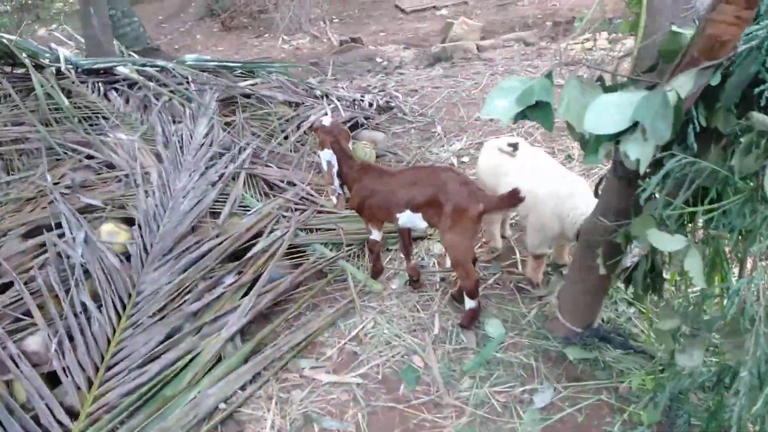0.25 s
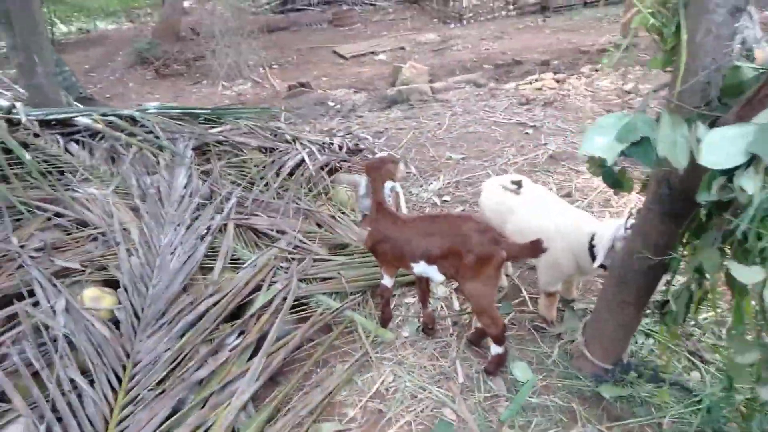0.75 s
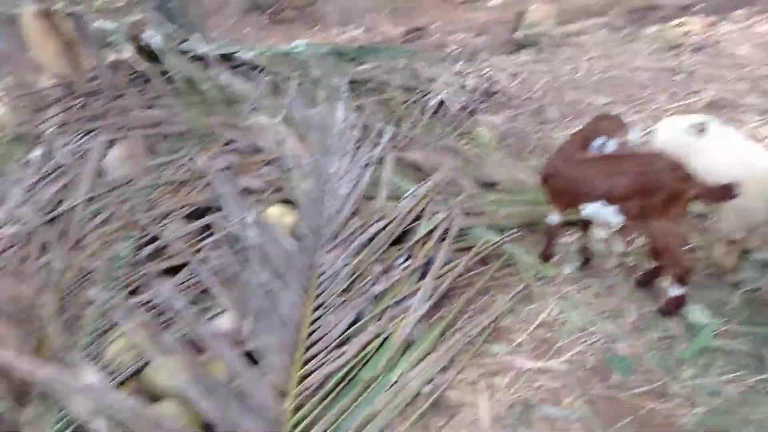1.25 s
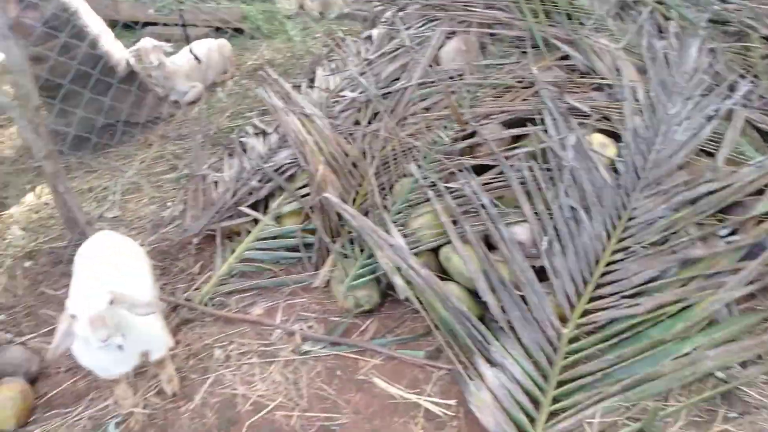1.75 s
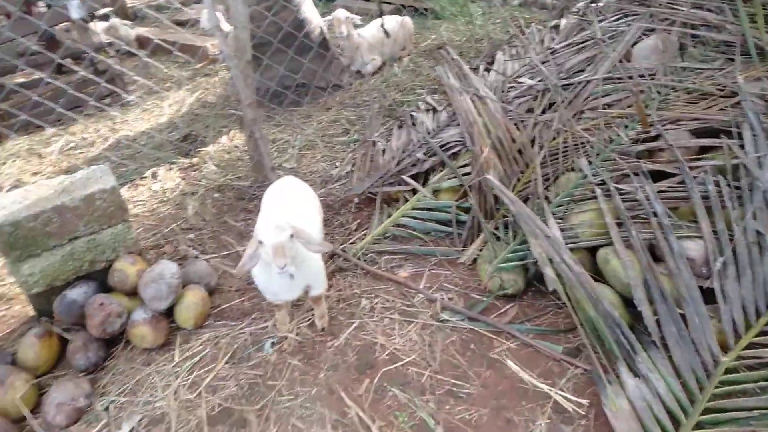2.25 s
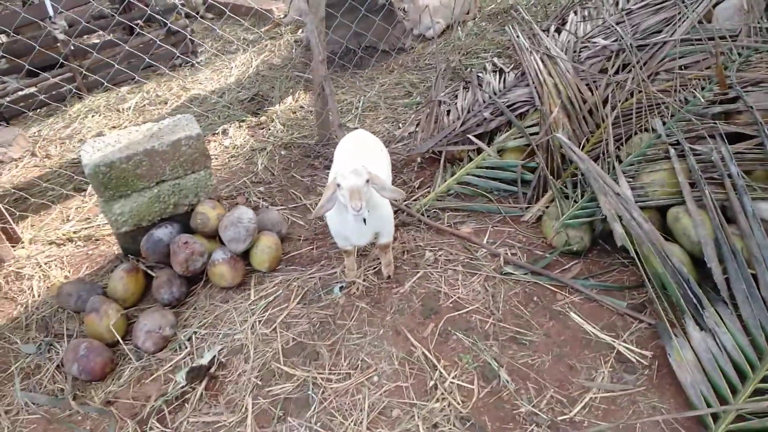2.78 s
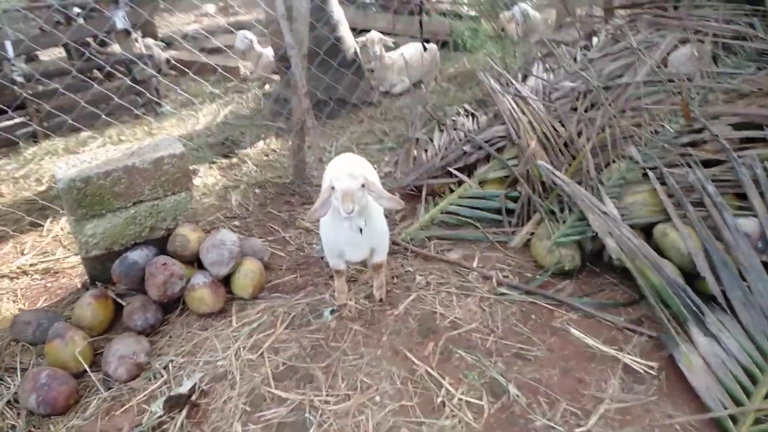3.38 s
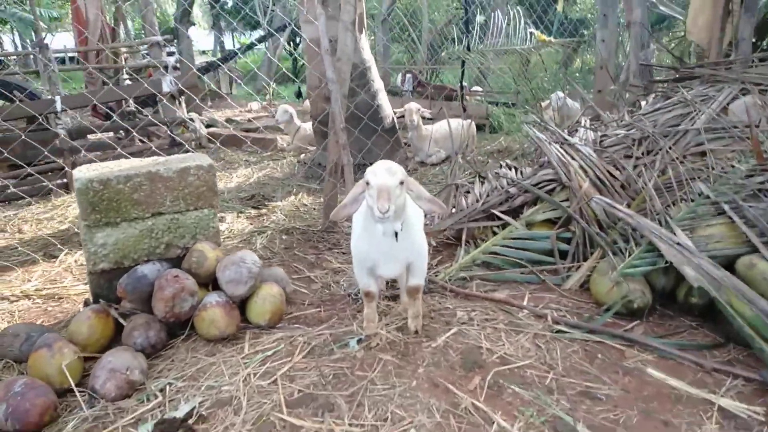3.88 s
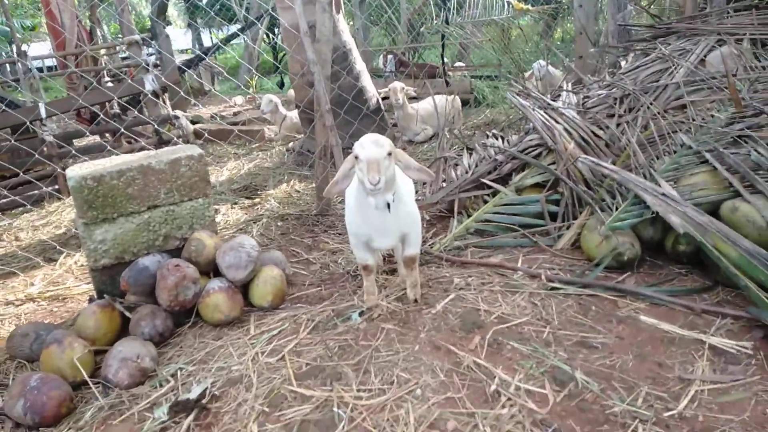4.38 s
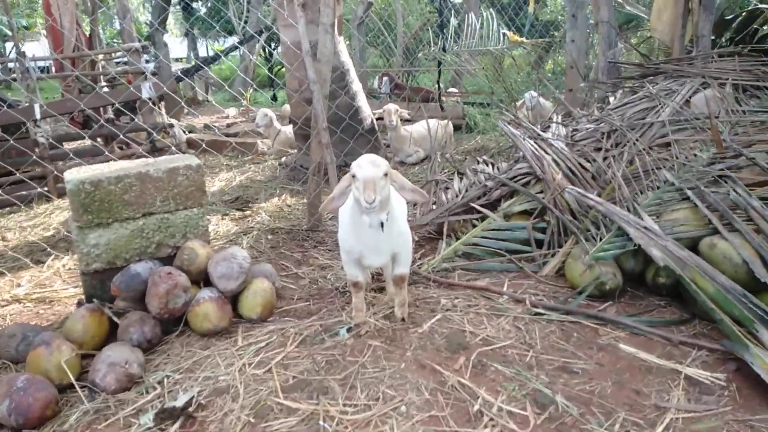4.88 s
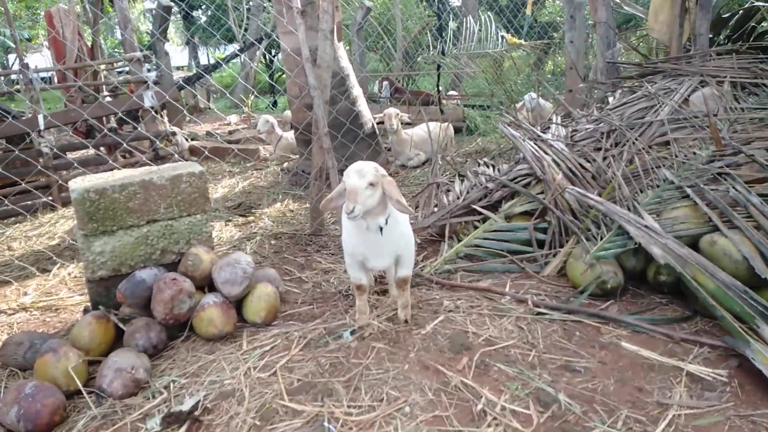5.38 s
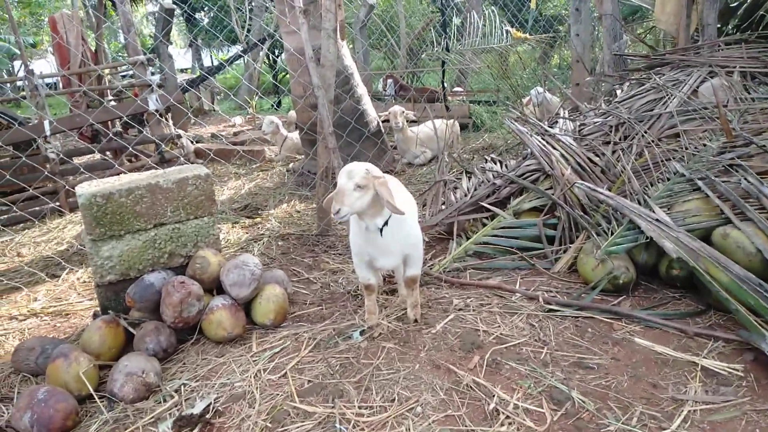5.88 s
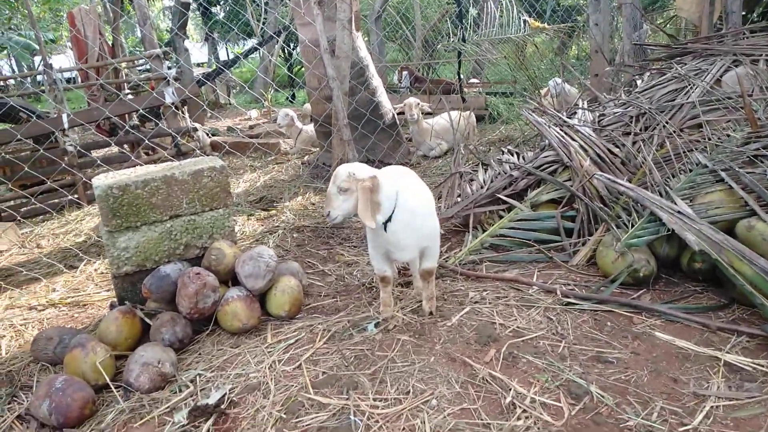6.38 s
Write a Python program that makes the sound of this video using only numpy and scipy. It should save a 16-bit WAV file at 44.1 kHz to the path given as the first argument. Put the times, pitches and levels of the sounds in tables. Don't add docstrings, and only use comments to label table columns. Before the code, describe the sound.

Quiet farmyard with small birds whistling, faint far bleats, dry fronds rustling and crackling, and one sharp close stalk snap midway.

```python
import sys
import numpy as np
from scipy import signal
from scipy.fft import rfft, irfft, next_fast_len
from scipy.io import wavfile
from scipy.ndimage import uniform_filter1d, map_coordinates

SR = 44100
rng = np.random.default_rng(int(sys.argv[2]) if len(sys.argv) > 2 else 0)


def invert_db(level):
    return 10 ** (np.asarray(level, dtype=float) / 20)


def wrap_up_sound(samples):
    columns = np.atleast_2d(samples).T
    tamed = np.clip(columns, -1, 1)
    steps = np.round(tamed * 32767).astype(np.int16)
    wavfile.write(sys.argv[1], SR, steps)


N = 292824


def unit(x):
    return x / np.sqrt(np.mean(x ** 2) + 1e-20)


def along(points, hz):
    f, db = np.transpose(points)
    return np.interp(np.log(hz + 1), np.log(f + 1), db)


def wobble(rate, n):
    return map_coordinates(rng.standard_normal(int(n * rate / SR) + 4), [np.arange(n) * rate / SR])


def filtered(x, response):
    m = next_fast_len(N + SR // 2)
    return irfft(rfft(x, m) * response(np.fft.rfftfreq(m, 1 / SR)), m)[:N]


def coloured(x, spectrum):
    return unit(filtered(x, lambda hz: invert_db(along(spectrum, hz))))


def hiss(spectrum):
    return coloured(rng.standard_normal(N), spectrum)


def patchy(patchy_db):
    z = signal.stft(rng.standard_normal(N + 512), nperseg=512)[2]
    field = uniform_filter1d(rng.standard_normal(z.shape), 6, 0)
    field = uniform_filter1d(field, 14, 1)
    return signal.istft(z * invert_db(patchy_db * unit(field)), nperseg=512)[1][:N]


def resonances(modes):
    def response(f):
        total = 0
        for k, (centre, width, db) in enumerate(modes):
            damping = 1j * f * width
            total = total + (-1) ** k * invert_db(db) * damping / (centre ** 2 - f ** 2 + damping)
        return total
    return response


def swells(rows):
    t = np.arange(0, N + 16, 16) / SR
    power = 0
    for s, db, swell, fade in rows:
        power = power + invert_db(db - 20 * np.maximum((s - t) / swell, (t - s) / fade)) ** 2
    return np.interp(np.arange(N) / SR, t, np.sqrt(power))


def add(track, s, sound):
    part = track[round(s * SR):][:len(sound)]
    part += sound[:len(part)]


def placed(events):
    track = np.zeros(N)
    for s, sound in events:
        add(track, s, sound)
    return track


def note(knots, direct_db, echo_db, t60, breath_hz=0, octave_db=-40, gather_s=.004, flutter_db=1.4):
    s, hz, db = np.transpose(knots)
    t = np.arange(int(s[-1] * SR)) / SR
    edge = np.clip(np.minimum(t, s[-1] - t) / 0.0056, 0, 1)
    pitch = np.interp(t, s, hz) + breath_hz * wobble(330, len(t))
    phase = 2 * np.pi * np.cumsum(pitch) / SR
    size = edge * invert_db(np.interp(t, s, db) + flutter_db * wobble(91.6, len(t)))
    tone = np.sqrt(2) * size * (np.sin(phase) + invert_db(octave_db) * np.sin(2 * phase))
    lag = np.arange(int(t60 * SR)) / SR
    tail = rng.standard_normal(len(lag)) * invert_db(-60 * lag / t60) * (1 - np.exp(-lag / gather_s))
    tail *= invert_db(echo_db) / np.linalg.norm(tail)
    tail[0] = invert_db(direct_db)
    return signal.fftconvolve(tone, tail)


def timed(knots, **voice):
    return knots[0][0], note(np.subtract(knots, [knots[0][0], 0, 0]), **voice)


def slide(length, start_hz, end_hz, db):
    return [(0, start_hz, db - 5),
            (.25 * length, .93 * start_hz + .07 * end_hz, db - 2),
            (.6 * length, .5 * (start_hz + end_hz), db),
            (length, end_hz, db - 5)]


def calls(rows, **voice):
    track = np.zeros(N)
    for s, length, start_hz, end_hz, db in rows:
        middle = (.35 * length, .72 * start_hz + .28 * end_hz, db)
        add(track, s, note([(0, start_hz, db - 5), middle, (length, end_hz, db - 5)], **voice))
    return track


# (f/Hz, level/dB per Hz)
YARD_COLOUR = [(12, -20), (20, 2), (116, -1), (347, -11.5), (642, -10), (1570, -15), (1910, -16.5),
               (2390, -20), (4810, -27), (5680, -19.5), (6910, -20), (9400, -32), (12800, -31.5),
               (14700, -27.5), (16000, -38.5)]


def yard():
    return invert_db(-58.78 + 0.25 * wobble(3.45, N)) * coloured(patchy(1.4), YARD_COLOUR)


# (t/s, level/dB)
HERD_LEVEL = [(0.0, -61.0), (0.37, -62.5), (0.7, -61), (1.0, -64), (1.52, -72), (2.35, -68.5), (3.0, -61.5),
              (3.42, -62.5), (3.62, -63), (3.75, -58.5), (4.46, -69), (4.83, -71), (5.12, -65), (5.47, -80),
              (6.12, -65.5), (6.64, -77)]
# (f/Hz, level/dB per Hz)
HERD_COLOUR = [(250, -50), (450, 3), (1000, -6), (1700, 2), (2500, -8), (4000, -50)]


def herd():
    s, db = np.transpose(HERD_LEVEL)
    loudness = invert_db(np.interp(np.arange(N) / SR, s, db, left=-120))
    return invert_db(-4.5) * loudness * coloured(patchy(-0.5), HERD_COLOUR)


# (t/s, length/s, start f/Hz, end f/Hz, level/dB)
CLEAR_CALLS = [
    (.49, 0.09, 1080, 1170, -69),
    (.62, .12, 3950, 4010, -77),
    (1.044, 0.081, 4600, 3400, -75.5),
    (3.66, .25, 1990, 1930, -63.5),
    (1.974, .04, 5400, 5300, -70),
    (4.512, .14, 2700, 2650, -72.5),
    (5.49, 0.12, 6780, 6700, -64.5),
    (5.74, 0.13, 1900, 1930, -72),
]


def clear_calls():
    return calls(CLEAR_CALLS, direct_db=-1.5, echo_db=-6.5, t60=.48, breath_hz=14)


# (t/s, length/s, start f/Hz, end f/Hz, level/dB)
HOARSE_CALLS = [(0, 0.12, 1450, 1624, -64.5), (0.043, 0.087, 1990, 2050, -69),
                (0.868, 0.16, 3680, 3070, -73), (3.655, 0.26, 1998, 1924, -62),
                (3.68, 0.17, 2200, 2230, -70), (3.686, 0.195, 1480, 1450, -68),
                (4.9, 0.17, 1740, 1620, -63), (5.04, .14, 1560, 1440, -65), (5.03, 0.24, 2100, 1680, -62),
                (4.865, 0.16, 4260, 4000, -65), (6.53, .09, 7100, 6900, -67)]


def hoarse_calls():
    return calls(HOARSE_CALLS, direct_db=-3, echo_db=-4.5, t60=.45, breath_hz=80)


# (t/s, f/Hz, level/dB)
LONG_CALL = [
    (.472, 1400, -66),
    (.5, 1450, -62),
    (.57, 1520, -66),
    (.64, 1680, -70),
    (.68, 1725, -65),
    (.76, 1700, -64),
    (.8, 1700, -71),
    (.95, 1690, -73),
]


def long_call():
    return placed([timed(LONG_CALL, direct_db=-1.5, echo_db=-8, t60=.45, breath_hz=45)])


# (t/s, length/s, start f/Hz, end f/Hz, level/dB)
FAR_BIRDS = [
    (0.122, 0.035, 7700, 6700, -51),
    (.28, .1, 7400, 6000, -65.5),
    (1.09, 0.04, 6750, 6300, -58.5),
    (2.168, 0.05, 7350, 6700, -62),
    (1.575, 0.05, 7400, 6000, -63),
]


def far_birds():
    voice = dict(direct_db=-10, echo_db=-1, t60=.45, breath_hz=150, gather_s=.008)
    return placed((s, note(slide(*call), **voice)) for s, *call in FAR_BIRDS)


# (t/s, length/s, start f/Hz, level/dB)
SLIDES_DOWN = [
    (3.24, 0.1, 4480, -56.5),
    (3.724, 0.1, 4620, -59.5),
    (4.25, .09, 4540, -60.5),
]


def hoarse_bird():
    voice = dict(direct_db=-12, echo_db=-1.5, t60=.55, breath_hz=85, octave_db=-11, gather_s=.035, flutter_db=2)
    return placed((s, note(slide(length, hz, .835 * hz, db), **voice)) for s, length, hz, db in SLIDES_DOWN)


# (t/s, f/Hz, level/dB)
WHISTLE = [
    (0, 6800, -5),
    (.02, 5900, -6),
    (.038, 5600, -6),
    (.06, 6130, -4.5),
    (.085, 6390, -1),
    (.12, 6370, 0),
    (.17, 6000, -5.5),
    (.205, 5450, -6),
    (.235, 5080, -8),
]
# (t/s, level/dB)
WHISTLE_TIMES = [
    (3.98, -58.5),
    (6.285, -60.5),
]


def thin_whistles():
    voice = dict(direct_db=-3.5, echo_db=-8, t60=0.4, breath_hz=35, flutter_db=2.5)
    return placed((s, invert_db(db) * note(WHISTLE, **voice)) for s, db in WHISTLE_TIMES)


# (t/s, length/s, start f/Hz, end f/Hz, level/dB)
WALL_RETURNS = [(.1, .06, 3380, 3370, -72), (1.45, .035, 3290, 3300, -60), (1.49, .06, 3310, 3300, -72),
                (1.57, .05, 3280, 3290, -72), (3.728, .095, 4640, 4620, -71), (3.27, .1, 4500, 4480, -71),
                (2.8, .06, 3350, 3340, -72), (3.147, .04, 3380, 3370, -65), (3.44, .06, 3400, 3390, -65),
                (3.5, .06, 3400, 3390, -66), (3.75, .08, 3500, 3490, -66), (5.9, .03, 3400, 3390, -64),
                (6.21, .05, 3372, 3360, -68), (4.13, .1, 6420, 6400, -72)]


def wall_returns():
    return calls(WALL_RETURNS, direct_db=-3, echo_db=-5, t60=.3, breath_hz=50)


# (t/s, held f/Hz, held level/dB, drop level/dB, hold/s)
HELD_NOTES = [
    (0.031, 3380, -59, -53.5, 0.036),
    (1.398, 3300, -54.5, -56, 0.043),
    (2.727, 3350, -60.5, -59, 0.044),
    (3.074, 3350, -57.5, -58, 0.036),
    (3.378, 3390, -63, -55.5, 0.04),
    (3.714, 3500, -58, -56.5, .024),
    (5.807, 3384, -55, -59, 0.04),
    (6.132, 3372, -53.5, -58.5, 0.046),
]


def dropping_bird():
    voice = dict(direct_db=-3, echo_db=-6.5, t60=0.33, breath_hz=65, flutter_db=2.2)
    track = np.zeros(N)
    for s, held_hz, held_db, drop_db, hold in HELD_NOTES:
        end_hz = .77 * held_hz
        knots = [(0, held_hz, held_db - 7),
                 (.015, held_hz - 30, held_db - 2),
                 (hold - .008, held_hz, held_db + 1),
                 (hold, held_hz - 90, drop_db),
                 (hold + .012, .35 * held_hz + .65 * end_hz, drop_db),
                 (hold + .022, end_hz + 30, drop_db - 3),
                 (hold + .032, end_hz - 40, drop_db - 12)]
        add(track, s, note(knots, **voice))
    return track


# (t/s, length/s, top f/Hz, level/dB)
NEAR_CLUCKS = [
    (1.347, .03, 2070, -61),
    (1.382, .02, 1900, -67),
    (3.012, .032, 2150, -57),
    (3.322, .034, 2000, -55),
]


def clucks():
    voice = dict(direct_db=-1, echo_db=-9, t60=.25, breath_hz=50)
    return placed((s, note([(0, .93 * hz, db - 8), (.5 * length, hz, db), (length, .92 * hz, db - 7)], **voice))
                  for s, length, hz, db in NEAR_CLUCKS)


# (t/s, sway level/dB, bump level/dB)
GRIP_SHIFTS = [(2.95, -66, -62), (3.12, -46, -53.5), (3.24, -58, -83), (3.36, -45.5, -53), (3.53, -61, -49),
               (3.6, -49, -46), (3.89, -58, -60), (4.3, -52, -51), (4.35, -44.5, -48.5), (4.59, -55, -60.5),
               (4.98, -58.5, -68), (5.29, -61, -60), (5.69, -52, -74), (6.08, -53, -64), (6.63, -45, -49.5)]
# (f/Hz, level/dB per Hz)
SWAY_COLOUR = [(12, 5), (35, 10), (60, -3.5), (120, -43.5)]
# (f/Hz, level/dB per Hz)
BUMP_COLOUR = [(30, -20), (70, 2), (120, -4), (220, -16), (450, -60)]


def hand():
    swell_s, fade_s = .1, .09
    sway = swells([(s, sway_db, swell_s, fade_s) for s, sway_db, _ in GRIP_SHIFTS])
    bump = swells([(s, bump_db, swell_s, fade_s) for s, _, bump_db in GRIP_SHIFTS])
    return sway * hiss(SWAY_COLOUR) + bump * hiss(BUMP_COLOUR)


# (t/s, peak level/dB, 20 dB swell/s, 20 dB fade/s)
TIP_BRUSHES = [
    (.7, -73, .8, .8),
    (1.4, -72, .2, .15),
    (2.25, -71, .25, .25),
    (3.05, -71, .25, .25),
    (4.15, -70, .8, .8),
    (5.98, -68, .1, .1),
    (6.24, -54.5, .25, .35),
]
# (f/Hz, level/dB per Hz)
TIP_COLOUR = [(8000, -40), (12000, -12), (14500, 0), (16500, 0)]


def leaf_tips():
    return swells(TIP_BRUSHES) * invert_db(2 * wobble(60, N)) * hiss(TIP_COLOUR)


# (t/s, length/s, level/dB)
HOOF_SCUFFS = [
    (3.08, .11, -68),
    (3.315, .06, -64),
    (2.487, .03, -62),
    (4.99, .04, -67),
]
# (f/Hz, level/dB per Hz)
STRAW_COLOUR = [(600, -27), (1300, -7), (2200, 3), (4500, -6), (6800, -1), (9000, -35), (12000, -40)]


def scuffs():
    t = np.arange(N) / SR
    strokes = 0
    for s, length, db in HOOF_SCUFFS:
        strokes = strokes + invert_db(db) * np.sin(np.pi * np.clip((t - s) / length, 0, 1))
    return strokes * invert_db(3 * wobble(150, N)) * hiss(STRAW_COLOUR)


# (t/s, peak level/dB, 20 dB swell/s, 20 dB fade/s)
HEAP_SHOVES = [(0, -75, .1, .2), (.29, -71, .06, .3), (1.11, -78, .15, .15), (1.59, -70, .45, .2),
               (2.02, -75, .4, .13), (2.54, -68, .3, .36), (2.821, -66, .25, .25), (3.66, -63, .17, .35),
               (3.9, -70, .1, 1.1), (4.986, -57, .1, .15), (5.11, -62, .15, .04), (5.37, -61, .3, .21),
               (5.63, -66, .18, .2), (5.9, -60, .15, .06), (6.172, -62, .3, .7), (6.422, -61, .08, .09),
               (6.59, -62, .3, .6)]
# (t/s, peak level/dB, 20 dB fade/s)
LEG_FLICKS = [(.15, -71, .05), (.94, -76, .1), (1.745, -68, .1), (2.495, -54, .06), (2.707, -67, .08),
              (3.195, -65, .38), (4.676, -62, .015), (4.788, -62, .03), (5.316, -50, .1), (5.708, -62, .05),
              (5.82, -54, .085), (6.525, -49, .026)]
# (f/Hz, level/dB per Hz)
FROND_COLOUR = [(700, -36), (1500, -12), (3000, -8), (4200, -5.5), (5000, -12), (7100, 0.5), (9600, -12.5),
                (12000, -8.5), (14000, -1.5), (15500, 4), (16500, 3)]


def rustle():
    grains = (rng.random(N) < 500 / SR) * invert_db(3.2 * rng.exponential(size=N))
    fade = invert_db(-60 * np.arange(SR // 100) / SR / 0.013)
    flares = signal.fftconvolve(grains, fade)[:N]
    rub = unit(patchy(.8)) * (invert_db(1.2 * wobble(40, N)) + .4 * flares)
    flicks = [(s, db, .007, fade_s) for s, db, fade_s in LEG_FLICKS]
    return invert_db(7.0) * swells(HEAP_SHOVES + flicks) * coloured(rub, FROND_COLOUR)


# (t/s, level/dB, f/Hz)
HOOF_KNOCKS = [(.422, -49, 2200), (.421, -49, 1400), (3.572, -53, 1900), (3.572, -55, 2450),
               (3.398, -54, 2100), (3.167, -54, 2300), (3.345, -50, 1250), (3.368, -51, 1350),
               (5.386, -52, 2850), (1.108, -56, 2500), (1.106, -56, 1900), (2.49, -44, 1370),
               (3.088, -44.5, 3200), (3.089, -48, 2400), (3.088, -49, 1400), (5.815, -51, 4300),
               (5.297, -48, 4150), (5.307, -52, 4350), (5.315, -47, 4200), (5.315, -47, 3350),
               (5.01, -53, 2300), (5.297, -53, 3400), (2.81, -52, 1800), (3.173, -47, 1390),
               (3.531, -47, 1410), (5.388, -50.5, 2430)]


def hoof_knocks():
    t = np.arange(SR // 40) / SR
    onset = 1 - np.exp(-t / .0008)
    return placed((s, invert_db(db + 1 - 60 * t / 0.02) * onset * np.sin(2 * np.pi * hz * t))
                  for s, db, hz in HOOF_KNOCKS)


# (t/s, peak level/dB, low part level/dB, top part level/dB)
RIB_CRACKS = [(.7858, -56, -12, -4), (1.3573, -54, -12, 0), (1.3785, -54, -14, -2), (1.409, -54, -6, -8),
              (1.428, -60, -12, 6), (1.5265, -55, -8, -6), (1.5796, -50, -14, -6), (1.7364, -57, -8, 2),
              (1.8343, -54, -12, -6), (2.481, -53, -10, 0), (2.4916, -42, -6, 5), (2.5018, -46, -8, 3),
              (2.7072, -51, -15, -4), (2.8104, -56, 1, 2), (2.8155, -54, -8, 0), (3.1665, -51, -12, -4),
              (3.1755, -46, -15, -2), (3.187, -51, -12, -4), (4.6765, -58, -7, 4), (4.7888, -57, -12, 10),
              (4.7932, -54, -12, 4), (4.899, -56, -8, -6), (4.9414, -56, -3, 0), (4.984, -44, -15, -8),
              (4.9868, -45, -15, -8), (4.9897, -45, -15, -8), (5.0828, -54, -5, -4), (5.1095, -53, -2, 4),
              (5.2967, -39, -7, 0), (5.3134, -34, -10, 1), (5.32, -42, -10, -2), (5.324, -44, -10, -2),
              (5.3488, -50, -9, 5), (5.373, -48, -12, -8), (5.384, -48, -6, -10), (5.3884, -37, -14, -12),
              (5.4978, -51, -17, -10), (5.6235, -54, -17, 7), (5.816, -45, -5, 0), (5.84, -52, -14, 6),
              (5.8687, -47, -14, -6), (5.883, -52, -6, -4), (6.0735, -58, -12, 3), (6.174, -53, -12, 6),
              (6.5075, -40, -18, -4), (6.5198, -29, -20, 0), (6.5275, -38, -16, 3), (6.5322, -37, -18, -6)]


def rib_cracks():
    low, middle, top = np.zeros((3, N))
    t = np.arange(SR // 40) / SR
    for s, db, low_db, top_db in RIB_CRACKS:
        burst = invert_db(db - 2 - 60 * t / .009) * rng.standard_normal(len(t))
        burst += invert_db(db - 15 - 60 * t / .04) * rng.standard_normal(len(t))
        burst *= 1 - np.exp(-t / 0.00013)
        add(middle, s, burst)
        add(low, s, invert_db(low_db) * burst)
        add(top, s, invert_db(top_db) * burst)
    middle_body = resonances([(7000, 2000, 5)])
    return (filtered(low, resonances([(1500, 900, 5), (3750, 1000, 8)]))
            + filtered(middle, lambda hz: middle_body(hz) ** 2)
            + filtered(top, resonances([(14600, 4200, 5.4)])))


# (t/s, f/Hz, level/dB)
SQUEAKS = [
    [(3.621, 1900, -50), (3.629, 2300, -51), (3.632, 2350, -58), (3.635, 2500, -48), (3.639, 2650, -47),
     (3.645, 2900, -53)],
    [(3.627, 6650, -52), (3.633, 6660, -46), (3.638, 6700, -53)],
    [(3.616, 11800, -62), (3.625, 11700, -61), (3.635, 11800, -65)],
]
# (t/s, f/Hz, level/dB)
ROOT_SHUDDER = [
    (3.6, 760, -43),
    (3.607, 700, -40),
    (3.6105, 500, -38),
    (3.614, 430, -39),
    (3.622, 270, -46),
]


def spring_apart():
    squeaks = placed(timed(knots, direct_db=0, echo_db=-12, t60=.05, breath_hz=250) for knots in SQUEAKS)
    return squeaks + placed([timed(ROOT_SHUDDER, direct_db=-1.5, echo_db=-20, t60=.05)])


# (t/s, level/dB, splinter level/dB)
FIBRES = [(3.5997, -20, 2), (3.6015, -11, -2), (3.6030, -16, 0), (3.6046, -14, 3), (3.6060, -11.2, -1),
          (3.6075, -15, 3), (3.6087, -20, 5), (3.6106, -21, 7), (3.6120, -25, 4), (3.6130, -24, 9),
          (3.6144, -31, 12), (3.6158, -34, 13), (3.6172, -39, 13), (3.6195, -37, 11)]
# (f/Hz, width/Hz, level/dB)
WHOLE_STALK = [(1450, 280, 10.5), (1950, 450, 2.5), (2550, 400, -3.5), (3180, 220, 2), (4100, 1000, -13),
               (5100, 300, -40), (6200, 600, -8.5), (7400, 1600, -12.5), (9700, 1000, -19),
               (11900, 300, -32), (13000, 1000, -23), (15600, 1400, -24)]
# (f/Hz, width/Hz, level/dB)
SPLIT_STALK = [(1500, 500, 3), (2050, 500, 3), (2600, 500, 1), (3180, 400, 2), (4300, 900, -10),
               (5300, 300, -40), (6200, 700, -9), (7400, 1600, -12), (9700, 1000, -19), (11900, 300, -32),
               (13000, 1000, -20), (15600, 1400, -23)]


def snap():
    whole, split = np.zeros((2, N))
    t = np.arange(SR // 200) / SR
    crumbs = [(FIBRES[-1][0] + .0011 * (k + .8 * rng.random()), -40 - .6 * k, 6) for k in range(1, 16)]
    for s, db, splinter_db in FIBRES + crumbs:
        crack = .2 * invert_db(splinter_db - 60 * t / 0.0055) * np.diff(rng.standard_normal(len(t) + 1))
        crack[0] = 1
        add(whole if s < 3.608 else split, s, invert_db(db + 23) * crack)
    upper_gap = resonances([(10900, 1300, -3)])
    lower_gap = resonances([(5300, 500, -2)])

    def radiation(hz):
        thin = hz ** 4 / (hz - 790j) ** 4
        return thin * (1 - upper_gap(hz)) * (1 - lower_gap(hz))

    rung = filtered(whole, resonances(WHOLE_STALK)) + filtered(split, resonances(SPLIT_STALK))
    return filtered(rung, radiation)


def scene():
    mix = yard() + herd()
    mix += rustle() + scuffs() + hand()
    mix += rib_cracks() + hoof_knocks()
    mix += snap() + spring_apart()
    mix += dropping_bird() + thin_whistles() + hoarse_bird() + far_birds()
    mix += clear_calls() + hoarse_calls() + wall_returns() + clucks() + long_call()
    mix += leaf_tips()
    return mix[None]


def top_cut(x):
    return signal.sosfilt(signal.butter(12, 17010, fs=SR, output="sos"), x)


def record(dry):
    mix = filtered(dry[0], lambda hz: np.where(hz < 15800, 1, invert_db(-45)))[None]
    return top_cut(mix)


dry = scene()
out = record(dry)
wrap_up_sound(out)
```